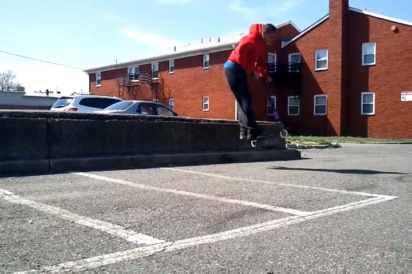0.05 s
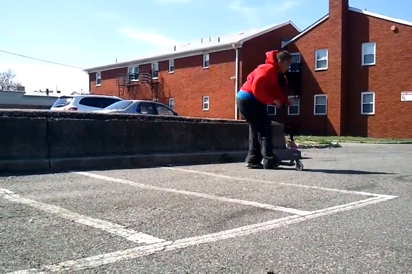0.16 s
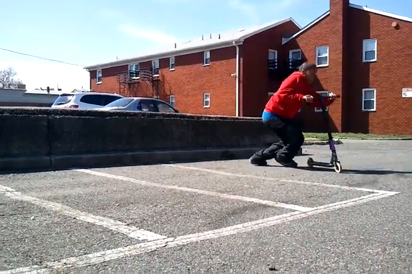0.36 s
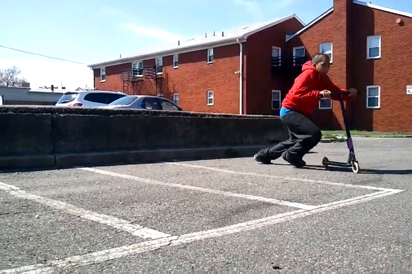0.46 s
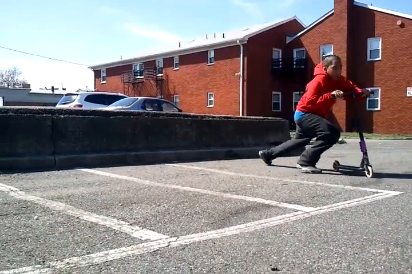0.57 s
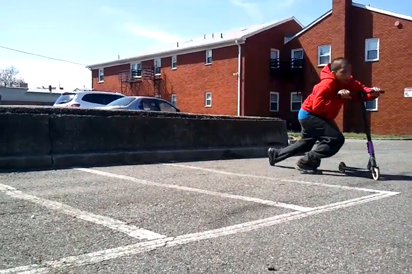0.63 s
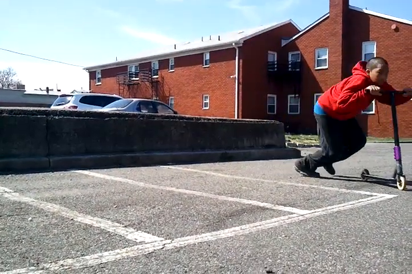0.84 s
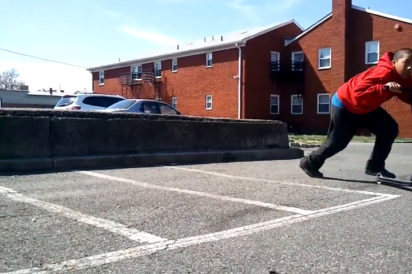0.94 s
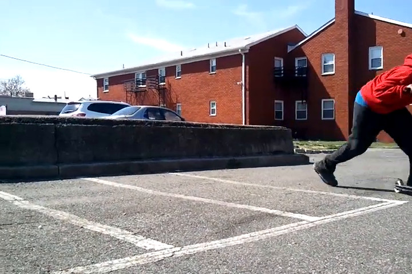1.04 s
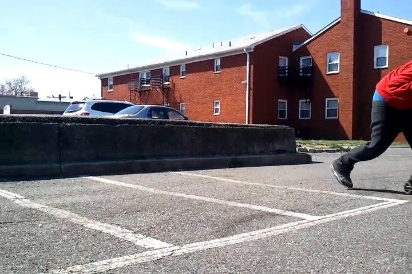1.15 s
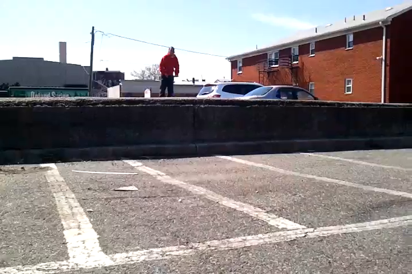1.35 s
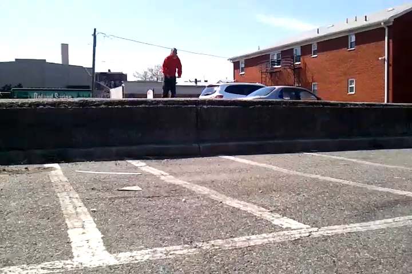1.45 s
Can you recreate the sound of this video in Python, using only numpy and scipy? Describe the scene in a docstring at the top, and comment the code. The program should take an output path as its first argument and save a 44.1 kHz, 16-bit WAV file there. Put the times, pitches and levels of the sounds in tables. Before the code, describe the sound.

A kick scooter gives two light metal clinks, then lands with a loud, slightly distorted clatter. A shoe slaps down and small wheels rattle over rough asphalt with a few scuffs. Faint traffic hums beyond the parking lot.

```python
"""Kick scooter landing on asphalt

A kick scooter hops off a low wall, clinks in the air and lands hard on a parking lot.
Deck and fork clatter, then small hard wheels rumble over coarse asphalt, the bearings sing
and a shoe slaps and scuffs the ground. Distant traffic hums.
The small camera has little treble and overloads on the landing."""
import sys
import numpy as np
from scipy import signal
from scipy.fft import rfft, irfft
from scipy.io import wavfile
from scipy.ndimage import uniform_filter1d, minimum_filter1d

SR = 44100
rng = np.random.default_rng(int(sys.argv[2]) if len(sys.argv) > 2 else 0)


def master_out(mix):
    """Clip the mix to full scale and print it as 16-bit PCM to the path in sys.argv[1]."""
    frames = np.transpose(np.atleast_2d(mix))
    ceiling = np.clip(frames, -1, 1)
    pcm = np.round(ceiling * 32767).astype(np.int16)
    wavfile.write(sys.argv[1], SR, pcm)


N = 66150
T = np.arange(N) / SR
LN_1000 = np.log(1000)  # time constants per t60


def undb(db):
    """Decibels to amplitude."""
    return 10 ** (np.asarray(db) / 20)


def unit_rms(x):
    """Scale to rms 1."""
    return x / np.sqrt(np.mean(x ** 2))


def through(x, response):
    """Pass a sound through an impulse response."""
    return signal.fftconvolve(x, response)[:N]


def colour(spectrum, size=4096):
    """Minimum-phase response of unit energy from (freq_hz, level_db) points."""
    hz, db = np.array(spectrum, float).T
    bins_hz = np.arange(size // 2 + 1) * SR / size
    shape_db = np.interp(np.log(bins_hz + 1), np.log(hz), db)
    cepstrum = irfft(np.log(undb(shape_db)))
    cepstrum[1:size // 2] *= 2
    cepstrum[size // 2 + 1:] = 0
    response = irfft(np.exp(rfft(cepstrum)))
    return response / np.linalg.norm(response)


def envelope(points):
    """Amplitude curve through (time_s, level_db) points."""
    time_s, level_db = np.array(points).T
    return undb(np.interp(T, time_s, level_db))


def decay(start_s, decay_s):
    """Sudden start, exponential fall."""
    return (T >= start_s) * np.exp(-np.abs(T - start_s) / decay_s)


def delayed(x, start_s):
    """Shift a sound to begin at start_s."""
    return np.interp(np.arange(N) - round(start_s * SR), np.arange(N), x, left=0)


def wobble(rate_hz):
    """Smooth random wobble, rms 1."""
    return unit_rms(np.interp(T * rate_hz, np.arange(N), rng.standard_normal(N)))


def band(pitch_hz, width_hz):
    """A resonance driven at random, rms 1."""
    bins_hz = np.arange(N // 2 + 1) * SR / N
    detuning = 2 * (bins_hz - pitch_hz) / width_hz
    return unit_rms(irfft(rfft(rng.standard_normal(N)) / (1 + detuning ** 2), N))


def grit(per_s, spread_db):
    """Tiny contacts at random times and of random size, rms 1."""
    contacts = (rng.random(N) < per_s / SR) * rng.choice([-1, 1], N)
    size_db = spread_db * np.minimum(rng.exponential(size=N), 4)
    return unit_rms(contacts * undb(size_db))


def strike(start_s, decay_s, response):
    """A short burst of contacts into a body; starts near rms 1."""
    fall = decay(start_s, decay_s)
    burst = through(fall * rng.choice([-1, 1], N), response)
    return burst * np.linalg.norm(fall) / np.linalg.norm(burst)


def ring(modes):
    """Free ringing of (pitch_hz, level_db, t60_s) modes."""
    return sum(undb(db) * decay(0, t60_s / LN_1000) * np.sin(2 * np.pi * hz * T)
               for hz, db, t60_s in modes)


# Loaded deck and frame resonances: pitch_hz, gain_db, t60_s
FRAME_MODES = [(342, -15, 0.077), (419, 1, 0.063), (520, 2, 0.089), (593, 3.5, 0.06), (812, 0.5, 0.093),
               (919, -4, 0.081), (1036, 3, 0.17), (1339, 0, 0.27), (1640, 2, 0.076), (1598, 5, 0.13),
               (2573, 0, 0.036), (3760, 4.5, 0.36), (4000, -2.5, 0.15), (4280, 1, .08), (4376, 1, 0.046),
               (4690, -2, .12), (4710, -0.5, .08), (5090, 1.5, 0.051)]


def frame_response(spectrum, boost_db=0.5):
    """A contact colour with the frame's resonances on top, unit energy."""
    body = 0
    for pitch_hz, gain_db, t60_s in FRAME_MODES:
        damping = LN_1000 / t60_s
        mode = np.exp(-damping * T) * np.cos(2 * np.pi * pitch_hz * T)
        body += undb(gain_db + boost_db) * 2 * damping / SR * mode
    impulse = T == 0
    response = through(body + impulse, colour(spectrum))
    return response / np.linalg.norm(response)


# Wheel and deck impacts: start_s, rattle_db, rattle_decay_s, thud_db
LANDING_BLOWS = [(.438, -17, 0.0043, -9), (0.4398, -8, 0.036, -9.5), (0.4456, -10.5, 0.025, -7),
                 (0.454, -22, 0.013, -19), (0.4628, -14, 0.01, -28), (0.4751, -8.5, 0.0098, -8.5),
                 (0.4819, -23.5, 0.011, -9), (.503, -15.5, .016, -35), (0.509, -11.5, .015, -24),
                 (0.535, -26, 0.0082, -40), (0.5435, -18.5, .006, -51), (0.569, -25.5, 0.0083, -49)]
# Impact spectra: freq_hz, level_db
RATTLE_SPECTRUM = [(60, -21), (250, -11.5), (500, -7.5), (700, -11), (1050, -0.5), (1500, -8.5),
                   (1900, -12.5), (3000, -10), (4400, -0.5), (5200, -3.5), (6500, -10), (9000, -23.5)]
THUD_SPECTRUM = [(40, -18.5), (90, -8.5), (160, -11), (230, -7.5), (380, -0.5), (680, -5), (1000, -5),
                 (1500, -4.5), (1900, -12), (3500, -19.5), (9000, -56.5)]


def landing(thud_decay_s=0.0055, push_db=-8.5):
    """Wheels and deck slam down and bounce; each blow thuds through the frame and shakes loose parts."""
    rattle, thud = frame_response(RATTLE_SPECTRUM), frame_response(THUD_SPECTRUM)
    solid_push = undb(push_db) * np.sqrt(thud_decay_s * SR / 2) * thud
    out = 0
    for start_s, rattle_db, rattle_decay_s, thud_db in LANDING_BLOWS:
        out += undb(rattle_db) * strike(start_s, rattle_decay_s, rattle)
        out += undb(thud_db) * (delayed(solid_push, start_s) + strike(start_s, thud_decay_s, thud))
    return out


# Treble rattle and wheel rumble envelopes: time_s, level_db
HISS_LEVELS = [(0.6, -46), (0.636, -40.5), (0.646, -29), (0.716, -32), (0.738, -42), (0.77, -15.5),
               (0.862, -28), (0.904, -19.5), (0.932, -30.5), (0.946, -23.5), (1.014, -22), (1.024, -25),
               (1.068, -16.5), (1.088, -26), (1.154, -34.5), (1.164, -27), (1.228, -47.5), (1.238, -34),
               (1.28, -21), (1.306, -28.5), (1.314, -28), (1.41, -29)]
RUMBLE_LEVELS = [(0.6, -41.5), (0.622, -44), (0.646, -33), (0.75, -36), (0.77, -18.5), (0.78, -25.5),
                 (0.9, -26), (0.926, -31.5), (1.094, -24), (1.222, -47), (1.27, -29.5), (1.306, -34),
                 (1.326, -27), (1.378, -37.5), (1.41, -34.5)]
# Their spectra: freq_hz, level_db
HISS_SPECTRUM = [(500, -29.5), (1500, -14.5), (2200, -10), (2900, -13), (3600, -4), (4300, -0.5),
                 (4900, -4.5), (6300, -5.5), (8000, -13.5), (9000, -11.5)]
RUMBLE_SPECTRUM = [(60, -12), (180, -25), (340, -6), (540, -7), (603, -3.5), (690, -10.5), (850, 2),
                   (1150, -2.5), (1700, -9), (2600, -20.5), (8000, -29)]


def rolling(load_s=0.07, jolt_db=1, hiss_boost_db=1):
    """Stones in the asphalt jolt the wheels, which rumble and rattle the frame."""
    touchdown_s = LANDING_BLOWS[0][0]
    rider_load = np.clip((T - touchdown_s) / load_s, 0, 1)
    jolts = rider_load * undb(jolt_db * wobble(rate_hz=130))

    def stones(levels, spectrum):
        contacts = grit(per_s=6500, spread_db=2.5) * jolts * envelope(levels)
        return through(contacts, frame_response(spectrum))

    hiss = undb(hiss_boost_db) * stones(HISS_LEVELS, HISS_SPECTRUM)
    return hiss + stones(RUMBLE_LEVELS, RUMBLE_SPECTRUM)


# Metal contacts in the hop: start_s, level_db, chatter_decay_s, ring_db, bar_share
HOP_CLINKS = [(0.1083, -17.5, 0.0032, -12.5, 0.6), (0.2051, -13.5, 0.0075, -0.5, 1)]
# Bar and fork resonances: pitch_hz, level_db, t60_s
BAR_MODES = [(2347, 3.5, 0.059), (3215, 3.5, .042), (4294, -0.5, 0.098), (4850, -2.5, 0.056),
             (5190, -6, 0.26), (5540, -16, 0.068), (7160, -8.5, .075), (7860, -3.5, .035)]
FORK_MODES = [(1910, -10, .04), (3630, 0.5, 0.18), (4463, -17, .15), (6150, -14, 0.17)]
# Metal contact spectrum: freq_hz, level_db
TICK_SPECTRUM = [(100, -22), (550, -1), (950, -3.5), (1500, -13.5), (3300, -9), (4400, 5.5), (5500, 2.5),
                 (7000, -10.5), (9000, -3)]


def clinks(graze_lead_s=0.0017, graze_db=-10, fork_boost_db=3, chatter_boost_db=1.5, ring_trim_db=-7.5):
    """Loose metal grazes, then chatters as the scooter leaves the wall; bar and fork ring freely."""
    tick = colour(TICK_SPECTRUM)
    bar, fork = ring(BAR_MODES), undb(fork_boost_db) * ring(FORK_MODES)
    out = 0
    for start_s, level_db, decay_s, ring_db, bar_share in HOP_CLINKS:
        tone = delayed(bar_share * bar + (1 - bar_share) * fork, start_s)
        chatter = strike(start_s, decay_s, tick)
        chatter += undb(graze_db) * strike(start_s - graze_lead_s, decay_s, tick)
        out += undb(level_db) * (undb(chatter_boost_db) * chatter + undb(ring_db + ring_trim_db) * tone)
    return out


# Shoe strikes: start_s, level_db, pitch_hz
SHOE_STRIKES = [(0.1935, -27, 455), (0.5751, -13.5, 930), (.5825, -44, 900), (1.318, -23, 760),
                (1.331, -23, 770)]
# Sole slap spectrum: freq_hz, level_db
SOLE_SPECTRUM = [(60, -31.5), (200, -25), (380, -0.5), (600, -11.5), (900, 0.5), (1500, -14), (2400, -10),
                 (3300, -24), (4600, -12.5), (9000, -41)]


def steps(slap_decay_s=0.0098, slap_db=-4, clack_t60_s=0.03, clack_db=5.5):
    """A shoe slaps the deck or the asphalt with a short hollow clack."""
    sole = colour(SOLE_SPECTRUM)
    out = 0
    for start_s, level_db, pitch_hz in SHOE_STRIKES:
        slap = strike(start_s, slap_decay_s, sole)
        clack = decay(start_s, clack_t60_s / LN_1000) * np.sin(2 * np.pi * pitch_hz * (T - start_s))
        out += undb(level_db) * (undb(slap_db) * slap + undb(clack_db) * clack)
    return out


# Sole scuffs and wheel skids: peak_s, level_db, rise_s, fall_s
SCUFF_STROKES = [(.099, -36, 0.0078, 0.0033), (0.7555, -31.5, 0.00087, 0.0093), (.770, -52, 0.0025, 0.0063),
                 (.903, -20, 0.024, .004), (0.9128, -14.5, 0.0028, 0.0037), (1.242, -44, 0.00086, .012),
                 (1.316, -19, .0015, 0.011), (1.333, -25, 0.0022, .006)]
# Scrape spectrum: freq_hz, level_db
SCUFF_SPECTRUM = [(200, -12), (800, -10), (1500, -4.5), (2200, 4.5), (3200, -1), (4200, 1.5), (5200, -12),
                  (9000, -21.5)]


def scuffs():
    """Rubber drags over grit, swelling and breaking off."""
    drag = 0
    for peak_s, level_db, rise_s, fall_s in SCUFF_STROKES:
        slope_s = np.where(T < peak_s, rise_s, fall_s)
        drag += undb(level_db) * np.exp(-np.abs(T - peak_s) / slope_s)
    return through(drag * grit(per_s=7000, spread_db=0.5), colour(SCUFF_SPECTRUM))


# Bearing resonances: pitch_hz, width_hz, level_db
BEARING_BANDS = [(4260, 340, -36), (984, 116, -37)]


def bearings(start_s=0.64, rise_s=0.018, fade_db_per_s=12.5):
    """Spinning wheels keep two fading resonances singing in the bearings."""
    spin = np.clip((T - start_s) / rise_s, 0, 1) * undb(-fade_db_per_s * (T - start_s))
    return spin * sum(undb(db) * band(hz, width_hz) for hz, width_hz, db in BEARING_BANDS)


# Deck hum envelope: time_s, level_db
HUM_LEVELS = [(.58, -78), (.69, -37.5), (.88, -57), (1.05, -49), (1.16, -40.5), (1.28, -38.5), (1.4, -37),
              (1.44, -59)]


def deck_hum():
    """The deck hums at a low resonance as it rolls."""
    return envelope(HUM_LEVELS) * band(pitch_hz=254, width_hz=12)


def reflections(sound, delay_s=0.0024, t60_s=0.18, level_db=-25.5):
    """House fronts return a faint, short wash."""
    tail = rng.standard_normal(N) * decay(delay_s, t60_s / LN_1000)
    wash = through(tail, colour([(100, 3.5), (1500, 0.5), (8000, -5.5)]))
    return undb(level_db) * through(sound, wash / np.linalg.norm(wash))


# Traffic spectrum: freq_hz, level_db
TRAFFIC_SPECTRUM = [(25, -34.5), (50, -22), (80, -3), (130, 2), (200, -3), (450, -5.5), (700, -8),
                    (1000, -9), (1500, -20.5), (3000, -24), (4500, -19), (6000, -25.5), (9000, -29)]
# Engine drones: pitch_hz, width_hz, mid_scene_db
ENGINE_DRONES = [(82.5, 13, -48), (259.6, 14, -46.5)]


def traffic(level_db=-39, waver_db=1, drone_fade_db_per_s=3.5):
    """Distant traffic wavers under slowly fading engine drones."""
    level = undb(level_db + waver_db * wobble(rate_hz=8.5))
    roar = level * through(rng.standard_normal(N), colour(TRAFFIC_SPECTRUM))
    drones = sum(undb(db) * band(hz, width_hz) for hz, width_hz, db in ENGINE_DRONES)
    return roar + undb(-drone_fade_db_per_s * (T - T.mean())) * drones


def scene():
    """The scooter, its reflections and the traffic, in mono."""
    scooter = clinks() + landing() + rolling() + bearings() + deck_hum() + steps() + scuffs()
    return (scooter + reflections(scooter) + traffic())[None]


LOW_CUT_HZ, HIGH_CUT_HZ, TOP_HZ = 48.3, 8055, 16200
LIMIT_LEVEL, LIMIT_S, OVERLOAD_LEVEL = 0.93, 0.00055, 0.86
STOP_S, STOP_DB, STOP_FADE_S = 1.4105, -26, 0.04


def record(dry):
    """The camera loses deep bass and the top octave, limits the landing and falls silent at the end."""
    thin = signal.sosfilt(signal.butter(2, LOW_CUT_HZ, "high", fs=SR, output="sos"), dry)
    dull = signal.sosfilt(signal.cheby1(10, 0.5, HIGH_CUT_HZ, fs=SR, output="sos"), thin)
    window = int(LIMIT_S * SR)
    needed_gain = LIMIT_LEVEL / np.maximum(np.abs(dull), LIMIT_LEVEL)
    gain = uniform_filter1d(minimum_filter1d(needed_gain, window), window)
    overloaded = np.clip(dull * gain, -OVERLOAD_LEVEL, OVERLOAD_LEVEL)
    fade = undb(STOP_DB) * np.exp(-((T - STOP_S) / STOP_FADE_S) ** 2)
    gate = uniform_filter1d(np.where(T < STOP_S, 1, fade), size=32)
    return signal.sosfilt(signal.ellip(8, 0.2, 70, TOP_HZ, fs=SR, output="sos"), overloaded * gate)


dry = scene()
out = record(dry)
master_out(out)
```